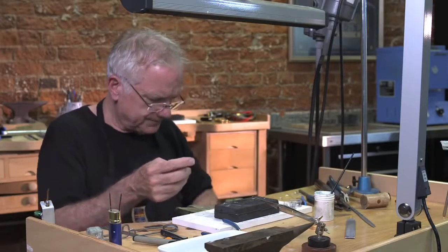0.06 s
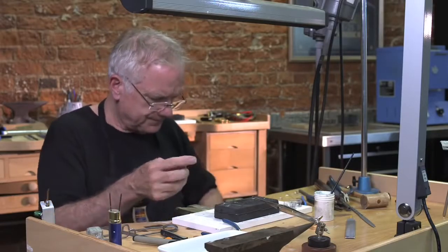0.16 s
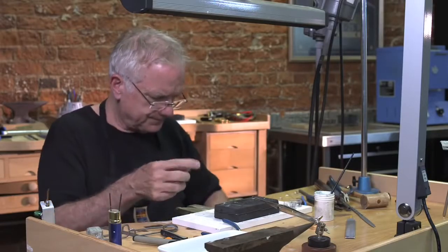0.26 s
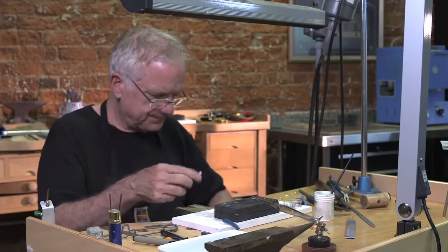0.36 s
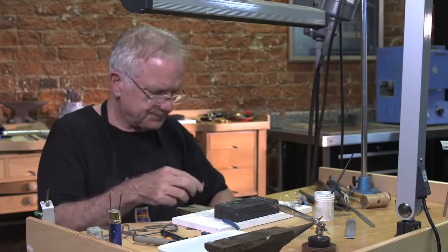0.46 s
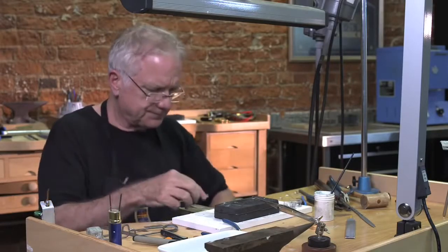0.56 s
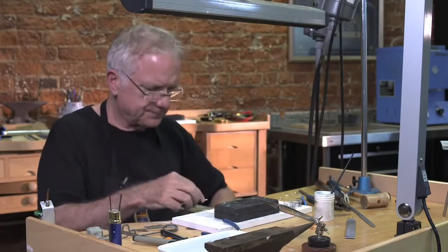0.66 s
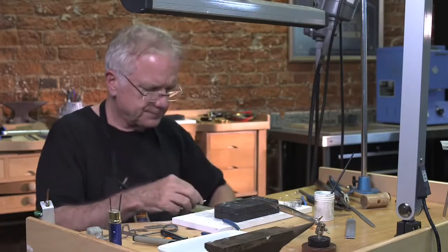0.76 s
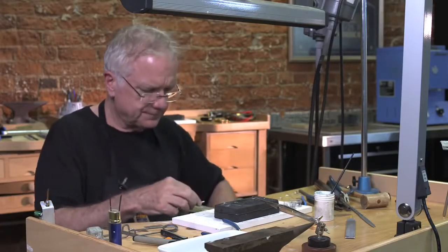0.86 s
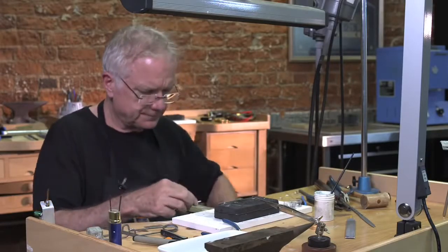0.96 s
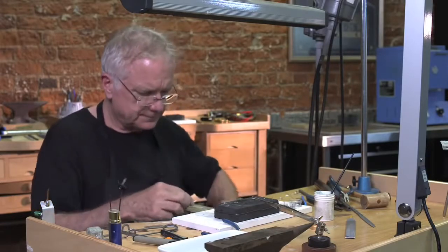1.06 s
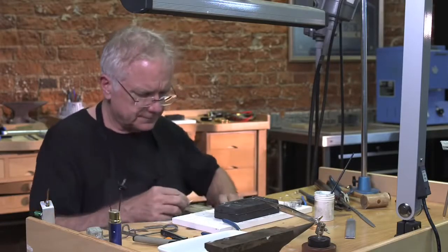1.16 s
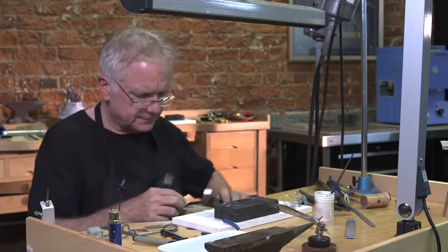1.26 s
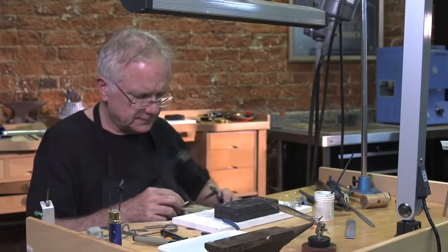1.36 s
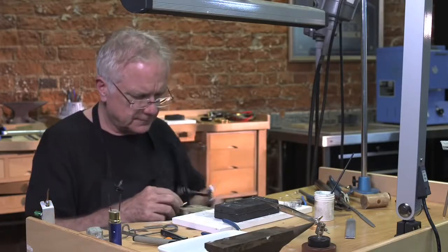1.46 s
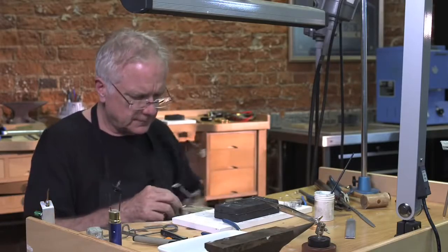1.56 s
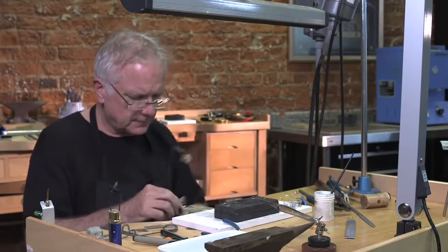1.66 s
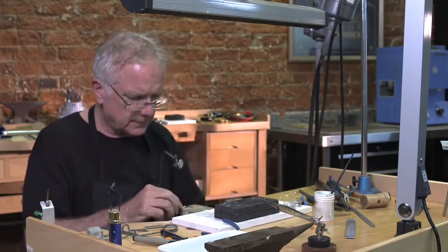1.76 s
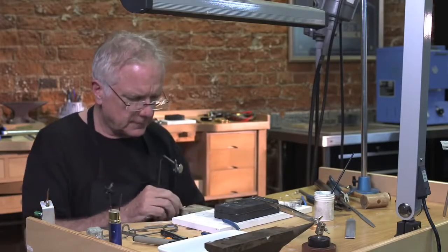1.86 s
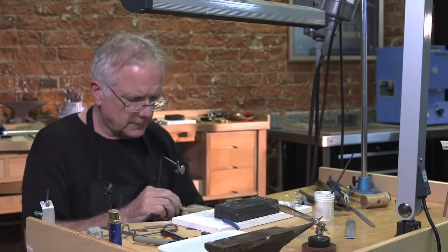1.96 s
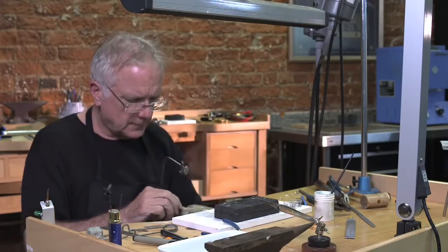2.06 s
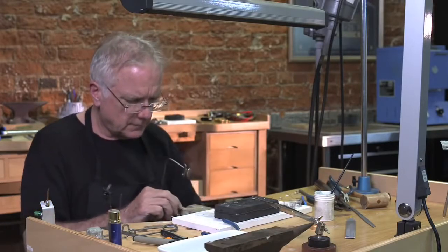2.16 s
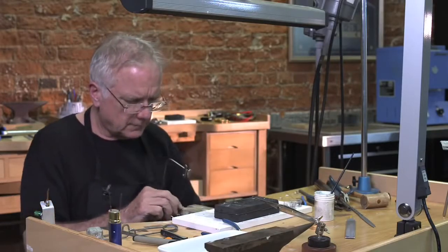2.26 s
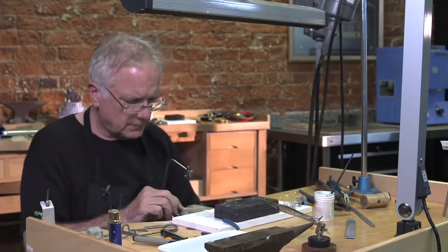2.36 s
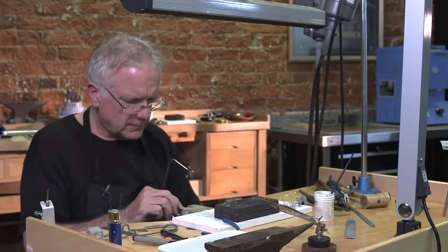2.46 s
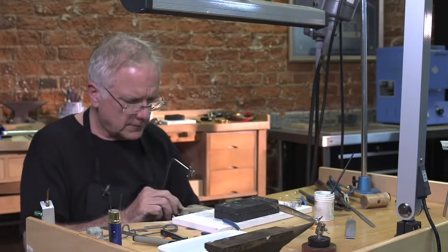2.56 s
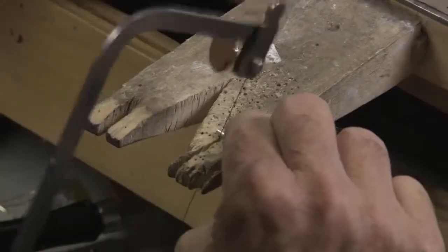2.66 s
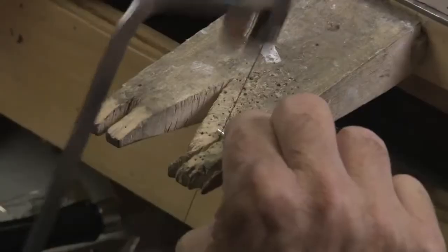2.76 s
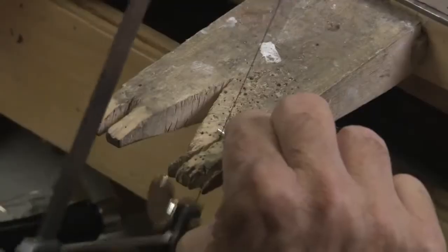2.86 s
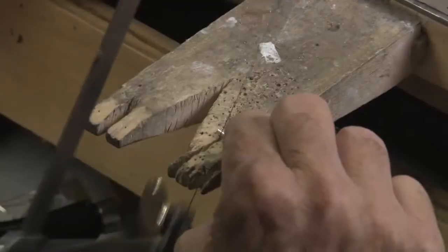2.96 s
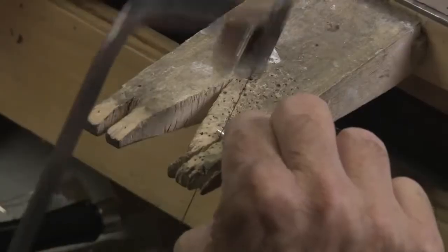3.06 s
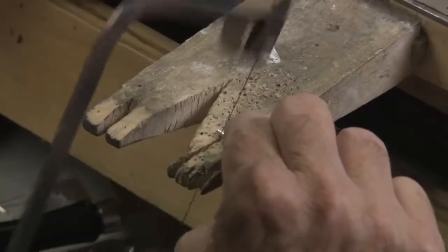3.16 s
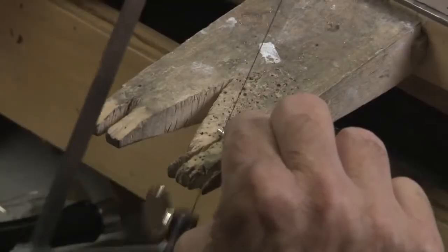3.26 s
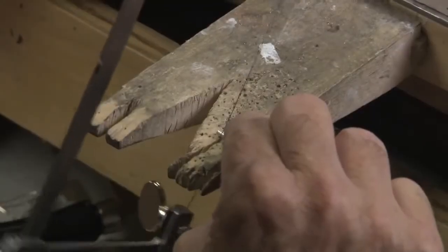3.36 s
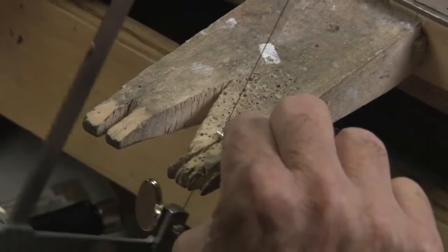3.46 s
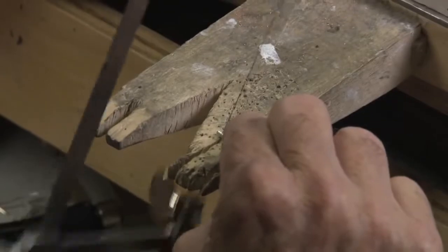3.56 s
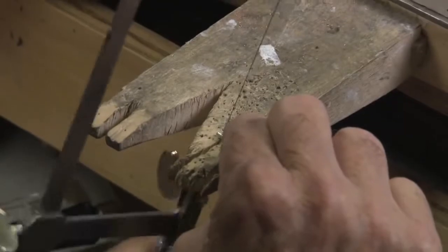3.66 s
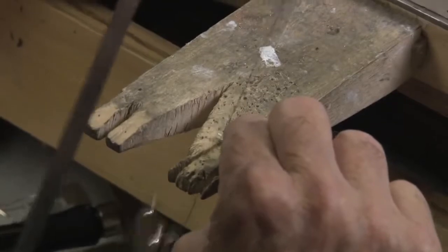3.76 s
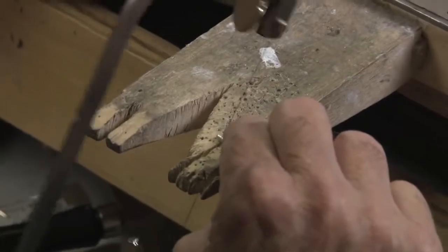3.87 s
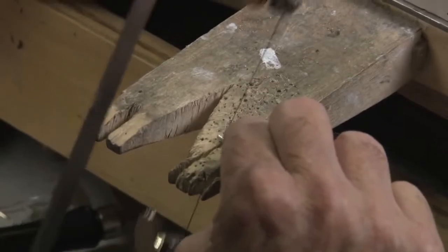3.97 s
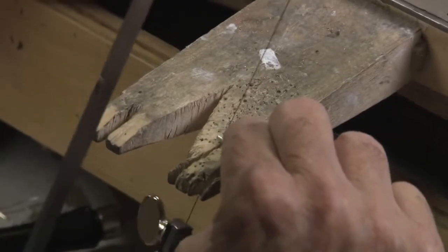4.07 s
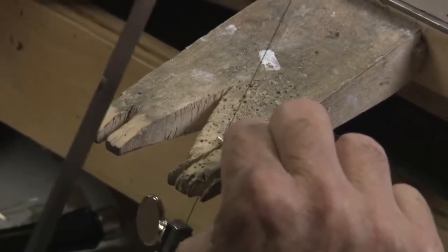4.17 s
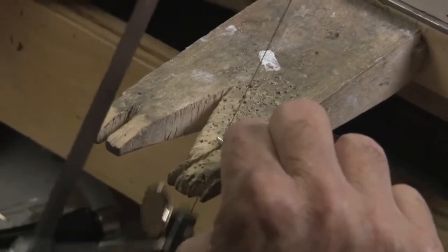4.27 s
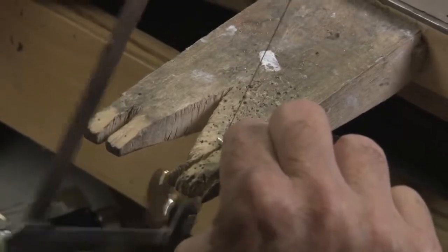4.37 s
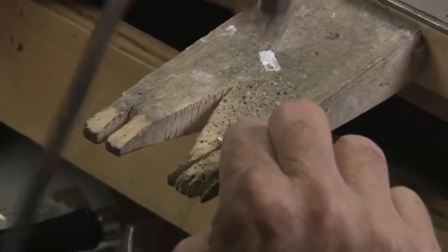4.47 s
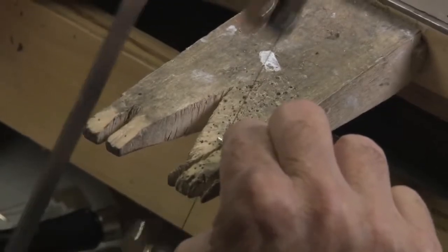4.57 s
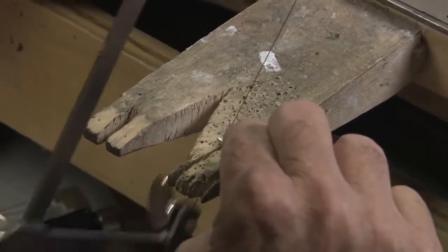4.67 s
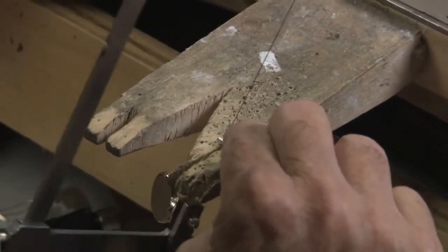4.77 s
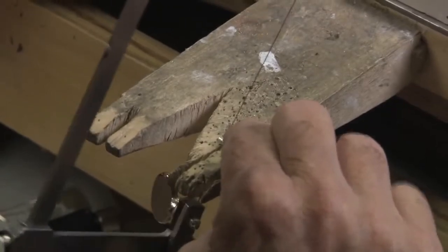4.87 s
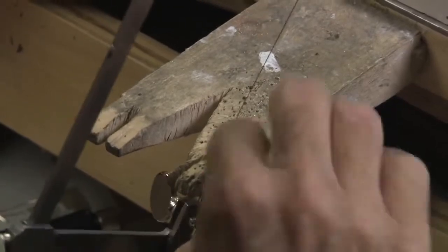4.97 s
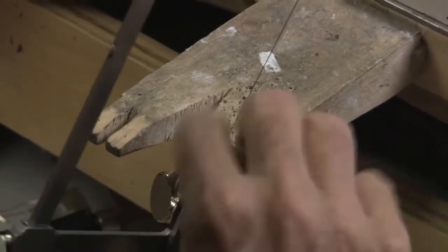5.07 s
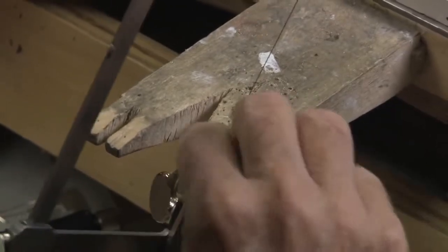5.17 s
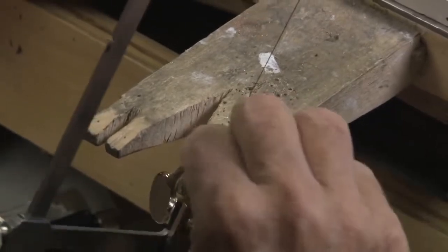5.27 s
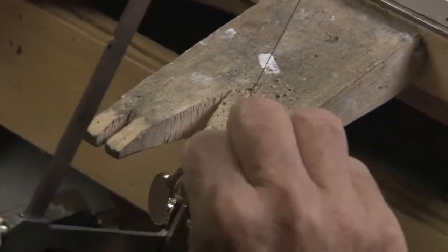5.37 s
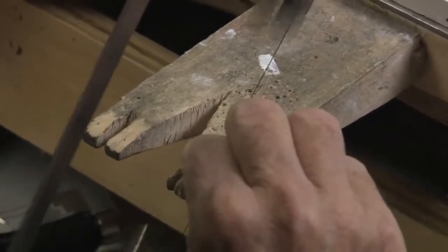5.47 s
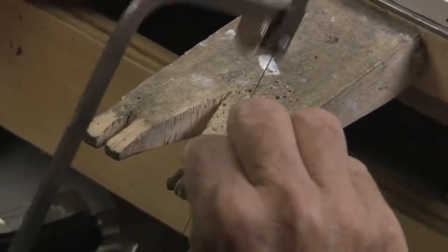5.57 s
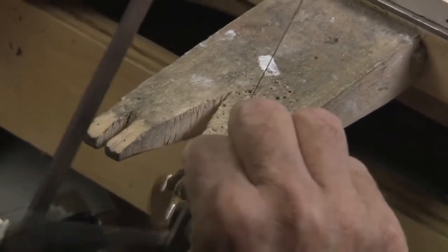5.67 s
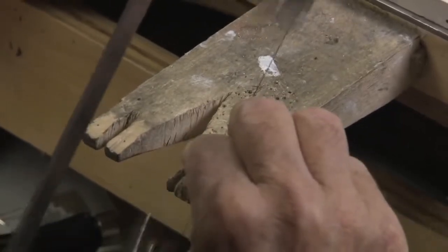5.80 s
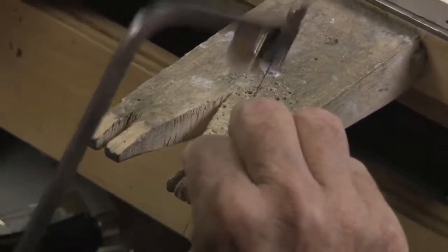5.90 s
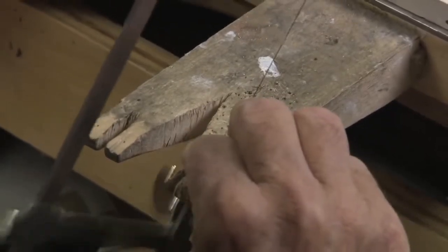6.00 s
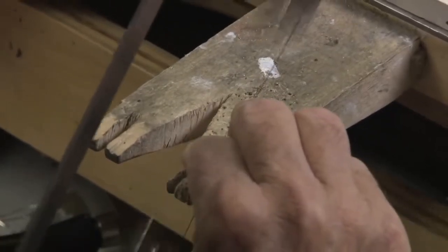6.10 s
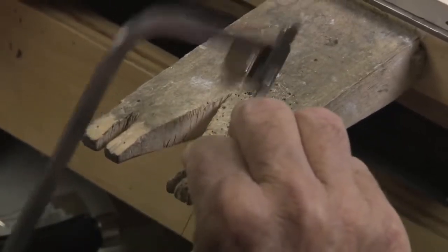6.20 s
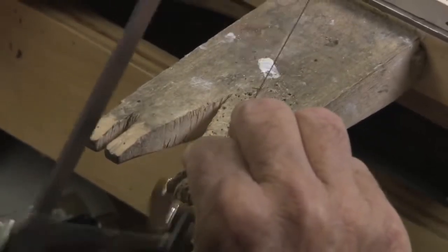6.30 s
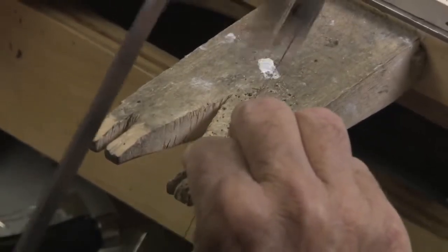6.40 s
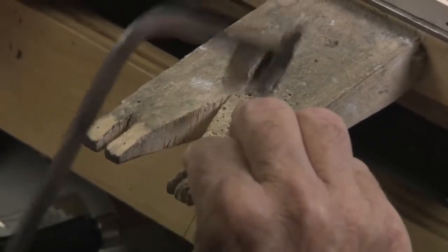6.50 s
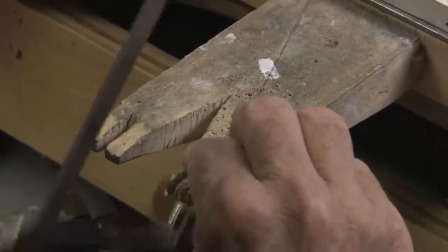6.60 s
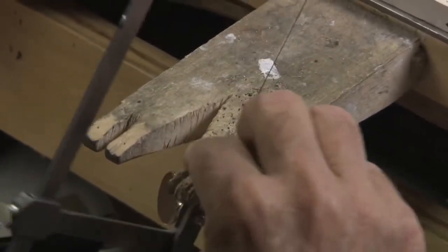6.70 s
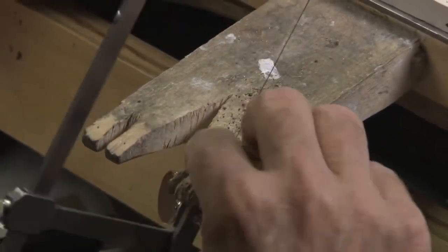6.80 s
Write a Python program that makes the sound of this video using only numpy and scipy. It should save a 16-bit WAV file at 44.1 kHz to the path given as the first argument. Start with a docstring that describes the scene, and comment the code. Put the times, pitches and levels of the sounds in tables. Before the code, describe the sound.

A light saw frame is picked up with thuds and clinks; after near silence it saws metal in quick, gritty bursts with sharp cracks.

```python
"""Jeweller's saw at the bench

A jeweller picks a saw frame up from a wooden bench, then saws thin metal tubing held on a bench pin.
Each stroke is a row of tooth ticks, faster and then slower: a rising and falling zip. The teeth ring the
tube, shake the wooden pin and throw off hissing chips; some snag and crack free, and the blade sings on.
Before that come thuds, steel clinks and brushing cloth, each a short push or grit through resonances.
A small, quiet workshop with a low rumble, one microphone close by."""
import sys
import numpy as np
from scipy import signal
from scipy.fft import rfft, irfft
from scipy.io import wavfile
from scipy.ndimage import uniform_filter1d

SR = 44100
rng = np.random.default_rng(int(sys.argv[2]) if len(sys.argv) > 2 else 0)


def inscribe(sig):
    """Save sig as 16-bit PCM at rate SR to the path in sys.argv[1].

    A 1-D sig is mono; a 2-D sig holds one channel per row.
    Samples are clipped to [-1, 1] before scaling.
    """
    pcm = np.round(np.clip(np.atleast_2d(sig).T, -1, 1) * 32767)
    wavfile.write(sys.argv[1], SR, pcm.astype(np.int16))


N = 301644

# colour of the metal rasp: pitch_hz, level_db (relative)
RASP_COLOUR = [(30, -53.5), (200, -36), (400, 0), (620, 6.5), (850, 6.5), (1250, 0), (1480, -3),
               (1950, -0.5), (2300, -12), (2700, -10), (3700, -10), (5000, -37), (8000, -34),
               (16000, -46.5)]
# colour of the hiss of chips and scrapes: pitch_hz, level_db (relative)
CHIP_COLOUR = [(1000, -42.5), (3500, -15), (5000, 5.5), (7000, 5.5), (9200, 5.5), (11000, -3), (14500, -3),
               (16000, -21.5)]
# resonances of tube, blade and saw frame: pitch_hz, level_db (relative), t60_s
TUBE_MODES = [(493.6, 4.5, 0.18), (709.4, 2, 0.47), (875, 7, 0.022), (1150, -29.5, .07), (1250, -7, 0.19),
              (1756, -7, 0.066), (1840, -14.5, .03), (1980, -3.5, 0.01), (2535, -1.5, 0.027),
              (2814, -5.5, 0.072), (3237, -4.5, 0.011), (3637, -0.5, 0.027), (4540, -25.5, .02)]
# ring of the wooden pin: pitch_hz, level_db (relative), t60_s
PIN_MODES = [(114, -4, 0.08), (210, -39, 0.031), (255, 8, 0.13), (341, 1, 0.095), (513, -5, .07)]


def saw(tear_db=-1, tear_share=1.0, tear_floor=0.061, tube_db=-1, chip_tick_db=-6,
        wood_noise_db=0, flutter_db=1.73):
    """Ticks and tearing metal ring the tube, shake the pin and throw off a fine hiss of chips."""
    along, speed, rate, rough, pressure, (rasp_db, wood_db, chips_db) = swing()
    ticks, phase = teeth(rate, rough)
    # metal tears just after each tooth bites; near the turn it only grinds
    grains = grit(rate=14000, spread_db=1.5)
    tearing = steady(grains * np.exp(-speed * phase / tear_share), span_s=0.027)

    force = above(ticks + undb(tear_db) * (rough + tear_floor) * tearing, 110)
    tube = undb(tube_db) * through(force, ring(TUBE_MODES))
    rasp = steady(through(force, colour(RASP_COLOUR)) + tube, span_s=0.027)
    hiss = through(tearing + undb(chip_tick_db) * ticks, colour(CHIP_COLOUR))
    chips = steady(near_surfaces(hiss), span_s=.02)
    shake = ticks + undb(wood_noise_db) * rough * tearing
    wood = steady(above(through(shake, ring(PIN_MODES)), 90), span_s=0.033)

    # slow teeth shake the wood, fast teeth rasp and throw chips
    slow = 1 - speed
    rasp *= undb(rasp_db - 10.5 * slow + swell(rate, hz=814, half_width_hz=120, db=2.3))
    chips *= undb(chips_db - 18 * slow)
    # the pin shakes harder late in each stroke
    late_db = 6.5 * (along - .5)
    wood *= undb(wood_db + 3 * slow + late_db + swell(rate, hz=313, half_width_hz=180, db=5.5))
    cutting = undb(digging() + flutter_db * walk(rate=110)) * (rasp + chips)
    return pressure * (cutting + wood)


# saw strokes: start_s, end_s, top_tooth_rate_hz (before wobble), least_roughness (0-1),
# rasp_db, wood_db, chips_db (mid-stroke, before swells, digs and flutter), pressure_rise_db over the stroke
STROKE_TABLE = [(2.531, 2.688, 1210, 0.97, -45.5, -49, -53.5, -4),
                (2.715, 2.91, 959, 0.13, -41.5, -51.5, -51, 11.5),
                (2.954, 3.118, 1279, 0.37, -41, -45.5, -49, -4.5),
                (3.122, 3.317, 934.5, 0.19, -41.5, -52, -49.5, 8.5),
                (3.529, 3.668, 926.4, 0.78, -48.5, -48.5, -56.5, -8.5),
                (3.692, 3.877, 1307, 0.91, -50.5, -45.5, -66, -14),
                (3.904, 4.087, 360, 0.51, -45.5, -47, -53, -19.5),
                (4.23, 4.361, 386.6, .3, -50, -50.5, -62.5, -7),
                (4.384, 4.523, 1085, 0.74, -48, -51, -60.5, -18.5),
                (4.534, 4.726, 681, 0.12, -47.5, -52, -59, -2.5),
                (5.416, 5.537, 1177, .2, -37.5, -43, -52.5, 2),
                (5.558, 5.722, 983, 0.19, -46, -52, -60.5, -3.5),
                (5.756, 5.884, 1404, 0.52, -43.5, -48.5, -56.5, -6.5),
                (5.885, 6.044, 1294, 0.28, -51.5, -61.5, -63.5, -10),
                (6.05, 6.184, 1636, 0.26, -41, -48, -52, -6.5),
                (6.189, 6.341, 1402, .35, -49, -58, -58.5, 4),
                (6.343, 6.482, 1410, .4, -46.5, -54.5, -59.5, -10),
                (6.499, 6.662, 1294, 0.41, -72, -73, -73.5, -6.5)]


def swing(wobble_db=0.3, judder_db=0.15, catch_share=.26, slip_share=.12):
    """The arm swings like a pendulum and leans on the saw: progress, speed, tooth rate, roughness,
    pressure and levels of the stroke under way."""
    bite_s, let_go_s, heard_from_s = 0.017, 0.024, 2.597
    t = np.arange(N) / SR
    along, pressure, settings = np.zeros(N), np.zeros(N), np.zeros((5, N))
    for start, end, *stroke, lean_db in STROKE_TABLE:
        inside = (t > start) & (t < end)
        since, left = t[inside] - start, end - t[inside]
        along[inside] = since / (end - start)
        hold = np.minimum(since / bite_s, 1) * np.minimum(left / let_go_s, 1)
        pressure[inside] = hold * undb(lean_db * (along[inside] - .5))
        settings[:, inside] = np.array(stroke)[:, None]
    speed = np.sin(np.pi * along)
    top_hz, rough, *levels_db = settings
    # the teeth catch unevenly early in the stroke and again just before the turn
    settled = np.minimum(np.minimum(along / catch_share, (1 - along) / slip_share), 1)
    rough = 1 - (1 - np.clip(rough, 0, 1)) * settled
    # the hand wobbles slowly, the blade judders fast in the cut
    judder = judder_db * (1 + rough) * walk(rate=400)
    uneven = undb(wobble_db * walk(rate=60) + judder)
    return along, speed, top_hz * speed * uneven, rough, pressure * (t > heard_from_s), levels_db


def teeth(rate, rough, jitter=0.12, scatter_db=7):
    """One tick a tooth, unevenly timed and sized where it is rough; also the phase between teeth."""
    travel = np.cumsum(rate + 1) / SR  # in teeth
    at = np.interp(np.arange(1, int(travel[-1])), travel, np.arange(N))
    timing, size = rng.standard_normal((len(at), 2)).T
    near = at.astype(int)
    local_hz = np.maximum(rate[near], 200)
    at = at + jitter * rough[near] * timing * SR / local_hz
    sizes_db = scatter_db * rough[near] * (np.clip(size, -2, 2) - .5)
    sizes = undb(sizes_db) * np.sqrt(SR / local_hz)
    # short sinc pulses place each tick between samples
    ticks = np.zeros(N)
    for tap in np.arange(-4, 5):
        index = np.clip(at.astype(int) + tap, 0, N - 1)
        np.add.at(ticks, index, sizes * np.sinc(index - at))
    return ticks, travel % 1


# the blade digs in suddenly, then eases: peak_s, extra_cutting_db
DIG_TABLE = [(2.65, 8.5), (3.029, 8.5), (3.24, 2.5), (3.547, 7.5), (3.712, 9), (4.403, 13.5), (4.575, 7),
             (5.44, 6.5), (5.494, 5), (5.781, 8), (5.828, 9)]


def digging(attack_s=0.0032, ease_s=0.025):
    """Extra dB of cutting each time the blade digs in."""
    t = np.arange(N) / SR
    extra_db = np.zeros(N)
    for s, db in DIG_TABLE:
        attack = np.clip((t - s) / attack_s + 1, 0, 1)
        extra_db += db * attack * np.exp(-((t - s) / ease_s) ** 2)
    return extra_db


def swell(rate, hz, half_width_hz, db):
    """Extra dB while the tooth rate is near a resonance."""
    return db * np.exp(-((rate - hz) / half_width_hz) ** 2)


# teeth that snag and break free: start_s, crack_db, wood_db (before bass cut), chip_db, length_s
SNAG_TABLE = [(2.642, -45.5, -53, -49, 0.004), (2.654, -51, -32.5, -69, 0.01),
              (3.089, -41, -36, -70.5, 0.002), (3.413, -64.5, -72.5, -74, 0.0027),
              (3.73, -47, -37.5, -67.5, 0.0028), (3.768, -41, -47, -56.5, 0.0094),
              (3.776, -33, -37.5, -41.5, 0.01), (3.7837, -34.5, -33, -33, 0.0027),
              (3.854, -53, -45, -56, 0.012), (4.379, -47.5, -40, -79, 0.0031),
              (4.415, -33, -43, -46, 0.0069), (4.4395, -40, -33.5, -60, 0.0036),
              (4.5, -37, -36.5, -58, 0.013), (5.828, -42.5, -50, -55, 0.0045),
              (6.422, -44, -40, -45.5, .002)]
# colour of the crack: pitch_hz, level_db (relative)
CRACK_COLOUR = [(40, -42), (250, 8), (900, 5), (2000, 3), (4000, 2.5), (6000, -7.5), (9000, -5),
                (12000, -20.5), (15500, -18)]
# colour of the flying chip: pitch_hz, level_db (relative)
SNAP_COLOUR = [(1000, -26), (6000, -16), (10000, -1), (14500, 3), (16000, 0.5)]


def snags():
    """A caught tooth lets go with a crack, a chip flies and the pin springs back."""
    s, crack_db, wood_db, chip_db, length = np.transpose(SNAG_TABLE)
    crack = blows(s, crack_db, length, colour(CRACK_COLOUR), chatter=0.3)
    chip = blows(s, chip_db, length / 2, colour(SNAP_COLOUR), chatter=0.93)
    wood = blows(s, wood_db, length, ring(PIN_MODES), chatter=0.11)
    return crack + chip + above(wood, 150)


# the taut blade sings on after a touch or a hard stroke: start_s, pitch_hz, level_db (before buzz)
TWANG_TABLE = [(1.539, 1120, -75), (3.04, 1303, -45), (3.771, 1315, -47.5), (4.421, 1049, -45),
               (5.476, 1170, -38.5), (5.828, 1178, -40.5), (6.423, 1326, -57)]


def blade(split_hz=55, rub_s=0.023, buzz_db=5.5, buzz_loss_db=-2, t60_s=.2):
    """The blade rings in two planes, slightly out of tune, and buzzes against the cut as it dies away."""
    ringing = np.zeros(N)
    for s, hz, db in TWANG_TABLE:
        planes = ring([(hz, 0, t60_s), (hz + split_hz, -3, t60_s / 2)])
        ringing += blows([s], [db], [rub_s], planes, chatter=0.051)
    return ringing * undb(buzz_db * walk(rate=170) + buzz_loss_db)


# knocks of the saw and hands on the bench: start_s, thud_db (before bass cut), click_db, length_s
KNOCK_TABLE = [(0.046, -56, -53, 0.0068), (0.285, -59, -65, 0.005), (0.3492, -33, -50.5, 0.0077),
               (0.372, -50, -55, 0.029), (0.417, -40, -58, 0.0088), (0.476, -39.5, -47, 0.02),
               (0.498, -34, -59, 0.01), (.519, -37.5, -45.5, 0.012), (0.6142, -31.5, -47.5, 0.0063),
               (0.641, -45, -46, 0.0054), (0.65, -35, -41.5, 0.0088), (0.678, -37, -46.5, 0.015),
               (0.753, -42.5, -47.5, 0.0052), (0.802, -53, -64, 0.0042), (0.87, -47.5, -44, 0.0086),
               (0.88, -43.5, -47.5, 0.016), (0.9, -45.5, -49, 0.023), (1.110, -51, -67, 0.003),
               (1.540, -64, -67, 0.004)]
# ring of the bench top: pitch_hz, level_db (relative), t60_s
BENCH_MODES = [(117, -11, 0.13), (183, -10.5, 0.13), (286, -1, 0.092), (327.7, 1.5, 0.06), (388, 2.5, 0.17),
               (476, 9, 0.04), (545, 1.5, 0.085), (724, 1, 0.13), (1044, -25.5, 0.081)]
# colour of the dull thud: pitch_hz, level_db (relative)
THUD_COLOUR = [(40, -18), (120, 8), (300, 11), (600, -1.5), (1200, -13), (2500, -24.5), (5000, -52.5),
               (16000, -67)]
# colour of the knock's click: pitch_hz, level_db (relative)
CLICK_COLOUR = [(100, -24), (450, 0.5), (1100, -2), (1600, -5), (2200, -6.5), (4200, -10), (6000, -19.5),
                (15500, -30)]
# ring of the blade clamp: pitch_hz, level_db (relative), t60_s
CLAMP_MODES = [(7730, -7, .12), (9810, 0, 0.044), (12430, 1.5, 0.037), (12800, -8, .1), (12950, -3, 0.066)]
# the steel frame clinks and scrapes: start_s, frame_db (before grip), clamp_db, length_s
CLINK_TABLE = [(0.367, -50, -75, 0.069), (.404, -35.5, -49, 0.004), (0.428, -42, -57, 0.021),
               (0.462, -39, -52, 0.015), (0.5, -40.5, -51, 0.011), (0.513, -41.5, -45, .002),
               (0.521, -41.5, -49, 0.021), (0.65, -42, -53, 0.0025), (0.669, -48.5, -54, 0.015),
               (.754, -56, -67, 0.0036), (0.886, -49.5, -47, 0.0044)]


def pick_up(ring_db=3, scrape_db=-7):
    """The saw knocks on the bench and its steel frame clinks as it is lifted."""
    s, thud_db, click_db, length = np.transpose(KNOCK_TABLE)
    top = ring(BENCH_MODES) * undb(ring_db)
    dull = colour(THUD_COLOUR)
    top[:len(dull)] += dull
    thuds = above(blows(s, thud_db, length, top, chatter=0.56), 74)
    clicks = blows(s, click_db, length, colour(CLICK_COLOUR), chatter=0.76)

    s, frame_db, clamp_db, length = np.transpose(CLINK_TABLE)
    frame = strike_frame() * grip()
    clamp = blows(s, clamp_db, length, ring(CLAMP_MODES), chatter=0.14)
    scrape = blows(s, frame_db + scrape_db, length, colour(CHIP_COLOUR), chatter=0.25)
    return thuds + clicks + frame + clamp + scrape


# ring of the steel frame: pitch_hz, level_db (relative, before the spread between spots), t60_s
FRAME_MODES = [(2340, -19, 0.037), (3010, -15.5, 0.045), (4320, -12, .14), (5670, -6.5, 0.086),
               (5710, -4.5, 0.15), (6060, -11, 0.079), (6570, -13, 0.12), (7600, -1, 0.077),
               (8620, -9, .08), (9540, 0.5, 0.13), (10120, -2, 0.064), (10920, -8.5, 0.102),
               (11250, -8.5, 0.08), (14400, -9, 0.091)]


def strike_frame(spread_db=3):
    """Each clink lands on another spot of the frame and favours other modes."""
    out = np.zeros(N)
    spots = rng.standard_normal((len(CLINK_TABLE), len(FRAME_MODES)))
    for (s, db, _, length), spot in zip(CLINK_TABLE, spots):
        modes = [(hz, mode_db + spread_db * luck, t60)
                 for (hz, mode_db, t60), luck in zip(FRAME_MODES, spot)]
        out += blows([s], [db], [length], ring(modes), chatter=0.11)
    return out


# the hand closes on the frame and mutes its ring: start_s, end_s
GRIP_TABLE = [(.568, .645), (0.676, 1.2)]


def grip(mute_db=-11, closing_s=0.018):
    """Share of the frame's ring that the hand lets through."""
    t = np.arange(N) / SR
    held = sum(1. * ((t > start) & (t < end)) for start, end in GRIP_TABLE)
    return undb(mute_db * uniform_filter1d(held, int(closing_s * SR)))


# sleeve and fingers brush along: middle_s, half_length_s, level_db (before jerks)
BRUSH_TABLE = [(.01, 0.051, -58), (.13, .12, -65), (0.545, .17, -56), (1.049, 0.17, -76.5)]
# colour of cloth: pitch_hz, level_db (relative)
CLOTH_COLOUR = [(88, -27.5), (150, -1), (918, -12.5), (1010, -24), (1130, -17.5), (1600, -14.5),
                (4290, -26), (15000, -45.5)]


def sleeve(jerk_db=2):
    """Cloth and fingers brush along in small jerks; each brush swells and fades."""
    t = np.arange(N) / SR
    brushing = sum(undb(db) * np.exp(-((t - s) / half) ** 2) for s, half, db in BRUSH_TABLE)
    cloth = through(grit(rate=13000, spread_db=3), colour(CLOTH_COLOUR))
    return brushing * undb(jerk_db * walk(rate=49)) * cloth


# colour of the room's rumble: pitch_hz, level_db (relative)
AIR_COLOUR = [(15, -50), (25, -20.5), (92, -3.5), (185, -13), (236, -9), (270, -23), (354, -15.5),
              (384, -22), (476, -21), (641, -26.5), (1100, -35), (1400, -37), (2610, -42.5), (14400, -50),
              (16000, -61.5)]


def ventilation(level_db=-64):
    """Low, steady rumble of the room: coloured noise."""
    rumble = through(rng.standard_normal(N), colour(AIR_COLOUR, size=16384))
    return undb(level_db) * above(rumble, 35)


def near_surfaces(x, echoes=((.0009, -9), (.0023, -10), (.0041, -12))):
    """Bench top and pin throw back early echoes (delay s, dB against direct) that comb the sound."""
    response = np.zeros(SR // 100)
    response[0] = 1
    for s, db in echoes:
        response[int(s * SR)] += undb(db)
    return through(x, response / np.linalg.norm(response))


def workshop(x, wet_db, low_t60=0.4, treble_t60=.24, split_hz=3400, treble_db=-12):
    """Diffuse echo of a small furnished room; the treble dies first."""
    t = np.arange(SR) / SR
    noise = rng.standard_normal(len(t))
    decay = np.exp(-np.log(1000) * t / low_t60)
    low_tail = signal.sosfilt(signal.butter(3, split_hz, fs=SR, output="sos"), noise) * decay
    treble_decay = np.exp(-np.log(1000) * t / treble_t60)
    high_tail = undb(treble_db) * rng.standard_normal(len(t)) * treble_decay
    tail = (low_tail + high_tail) * (t > .005) / np.linalg.norm(noise * decay)
    return x + undb(wet_db) * through(x, tail)


def blows(times, levels_db, lengths, response, chatter=.25):
    """Each blow is a push and a dying chatter of contacts; dB is its top rms over a hundredth of a second."""
    out, t = np.zeros(N), np.arange(SR // 10) / SR
    noises = rng.standard_normal((len(times), len(t)))
    for s, db, length, noise in zip(times, levels_db, lengths, noises):
        force = chatter * noise * np.exp(-(t / length) ** 2 / 2)
        force[0] += 1
        first = int(s * SR)
        sound = signal.fftconvolve(force, response)[:N - first]
        loudest = np.sqrt(uniform_filter1d(sound ** 2, SR // 100, mode="constant").max())
        out[first:first + len(sound)] += undb(db) * sound / loudest
    return out


def ring(modes):
    """Response of unit energy of decaying modes; dB is the relative energy of each."""
    t = np.arange(SR // 2) / SR
    response = np.zeros(len(t))
    for hz, db, t60 in modes:
        decay = np.exp(-np.log(1000) * t / t60)
        response += undb(db) / np.sqrt(t60) * np.sin(2 * np.pi * hz * t) * decay
    return response / np.linalg.norm(response)


def colour(points, size=4096):
    """Causal response of unit energy with the given spectrum."""
    hz, db = np.transpose(points)
    bins = np.maximum(np.fft.rfftfreq(size, 1 / SR), 1)
    cepstrum = irfft(np.log(undb(np.interp(np.log(bins), np.log(hz), db))))
    # folding the cepstrum forward gives minimum phase
    cepstrum[1:size // 2] *= 2
    cepstrum[size // 2 + 1:] = 0
    response = irfft(np.exp(rfft(cepstrum)))
    return response / np.linalg.norm(response)


def grit(rate, spread_db):
    """Dense random clicks, a few much larger than the rest."""
    sizes = undb(spread_db * np.minimum(rng.exponential(size=N), np.pi))
    return unit((rng.random(N) < rate / SR) * sizes * rng.choice([-1, 1], N))


def walk(rate):
    """Smooth random wander with an rms of 1."""
    k = int(SR / rate)
    return unit(uniform_filter1d(np.repeat(rng.standard_normal(N // k + 1), k), k)[:N])


def steady(x, span_s):
    """Even out the slow level and keep the fine grain."""
    k = max(int(span_s * SR), 2)
    power = np.abs(uniform_filter1d(uniform_filter1d(x ** 2, k), k))
    return x / np.sqrt(power + 1e-6 * np.mean(x ** 2))


def above(x, hz):
    """High-pass: small things radiate no deep bass."""
    return signal.sosfilt(signal.butter(2, hz, "high", fs=SR, output="sos"), x)


def through(x, response):
    """Pass a sound through an impulse response."""
    return signal.fftconvolve(x, response)[:N]


def unit(x):
    """Scale to rms 1."""
    return x / np.sqrt(np.mean(x ** 2))


def undb(db):
    """Decibels to gain."""
    return 10 ** (np.asarray(db) / 20)


def scene():
    """All sources in the room, one channel; the sawing fills the room more than the handling."""
    sawing = workshop(saw() + snags() + blade(), wet_db=-8.5)
    handling = workshop(pick_up() + sleeve(), wet_db=-11.5)
    return (sawing + handling + ventilation())[None]


def record(dry, top_hz=15900):
    """The recorder cuts the top with a steep low-pass."""
    return signal.sosfilt(signal.ellip(10, .2, 70, top_hz, fs=SR, output="sos"), dry)


dry = scene()
out = record(dry)
inscribe(out)
```